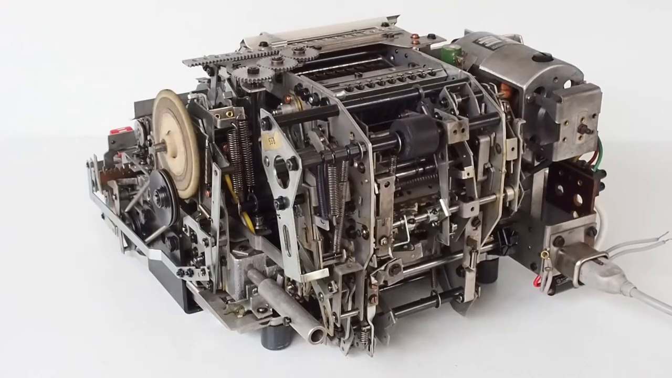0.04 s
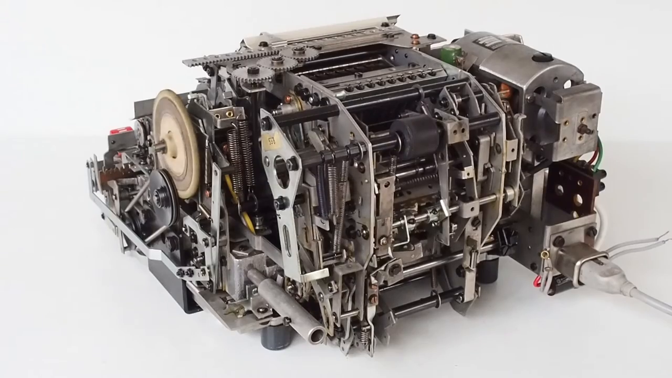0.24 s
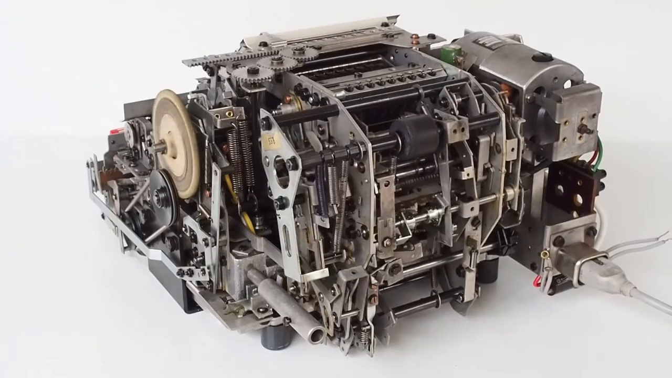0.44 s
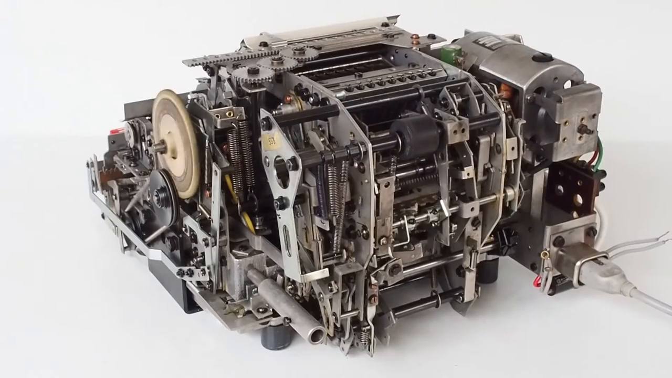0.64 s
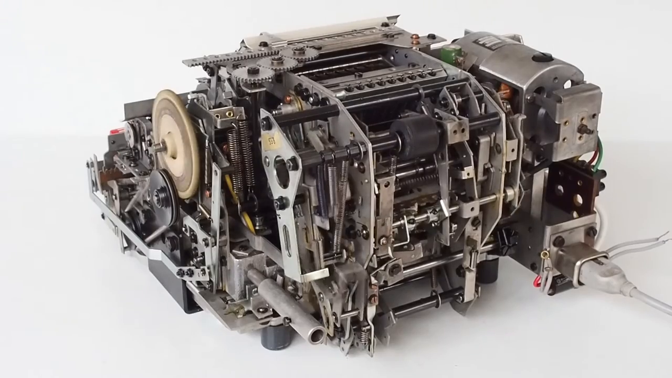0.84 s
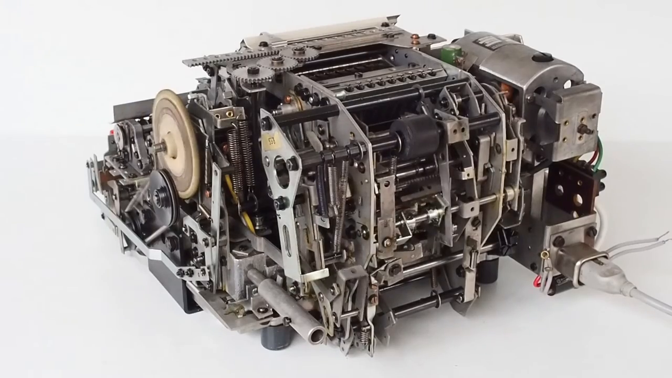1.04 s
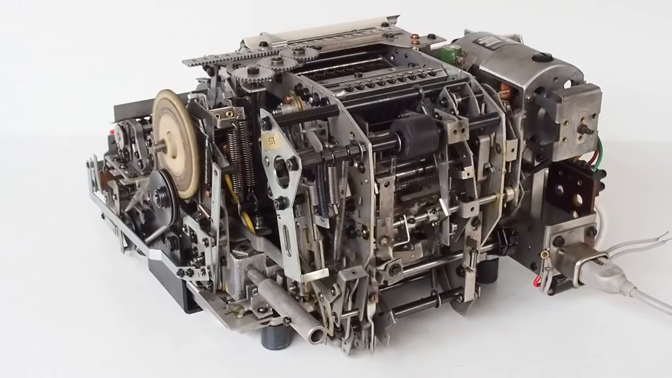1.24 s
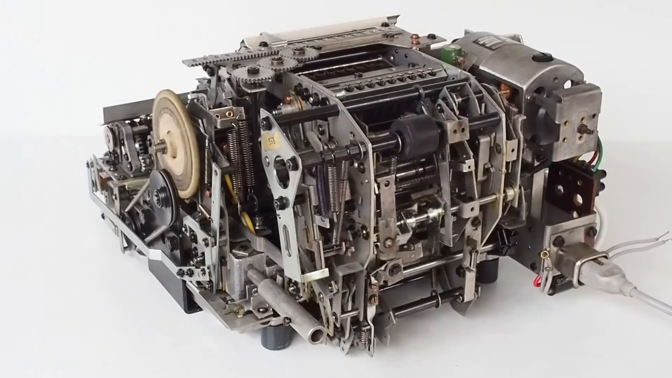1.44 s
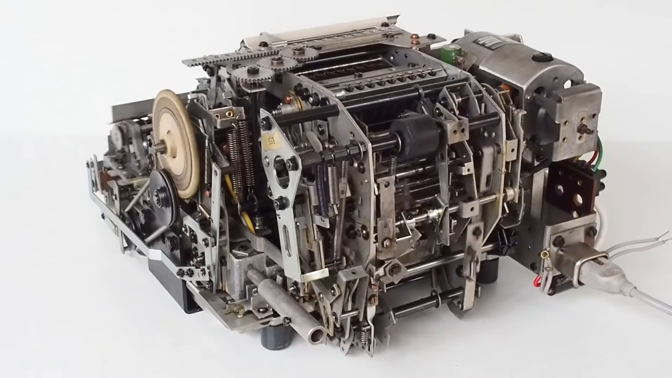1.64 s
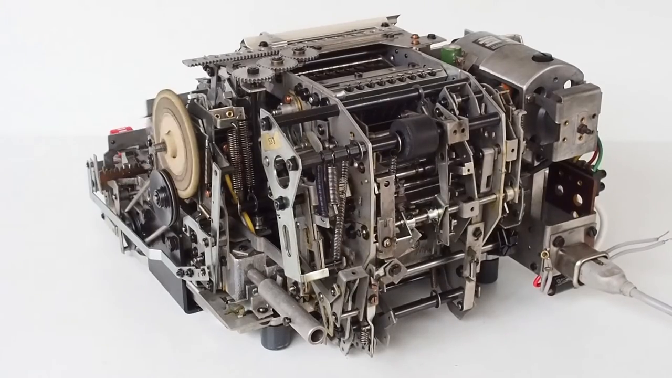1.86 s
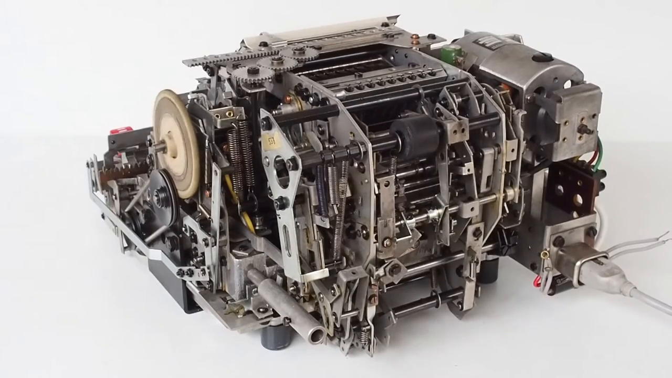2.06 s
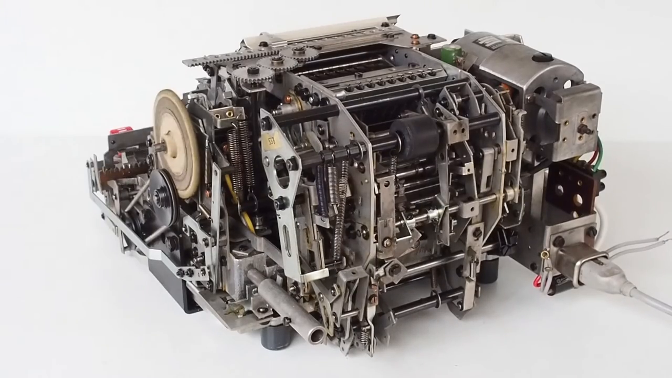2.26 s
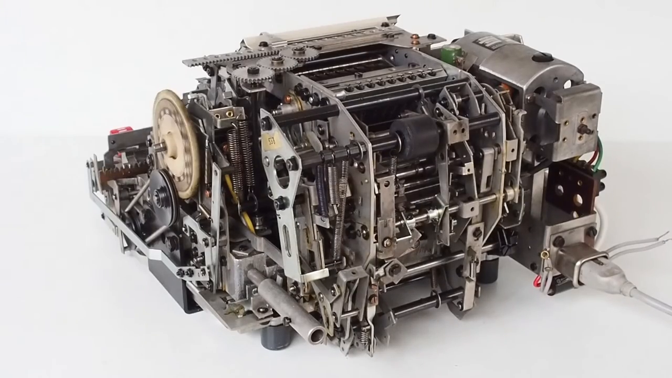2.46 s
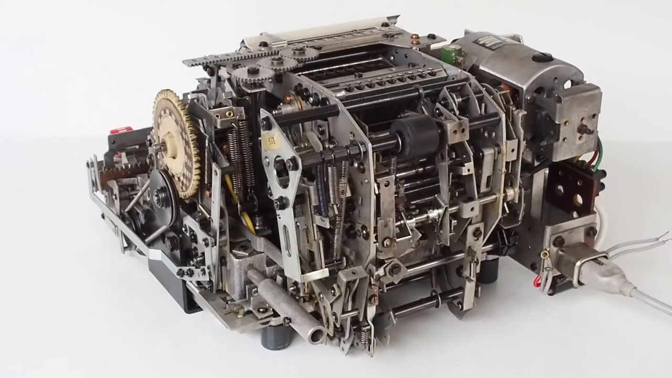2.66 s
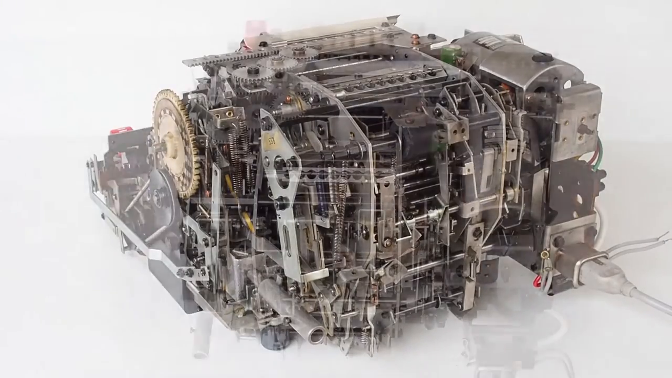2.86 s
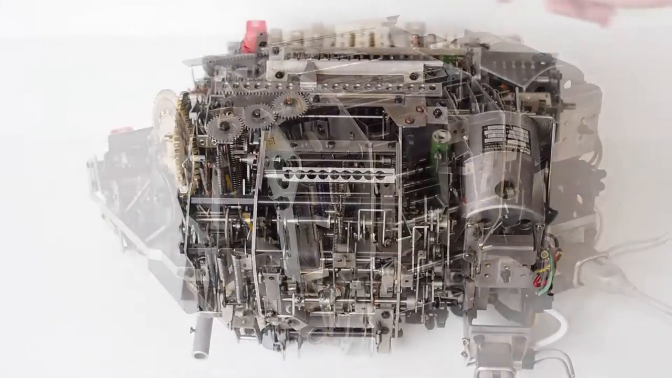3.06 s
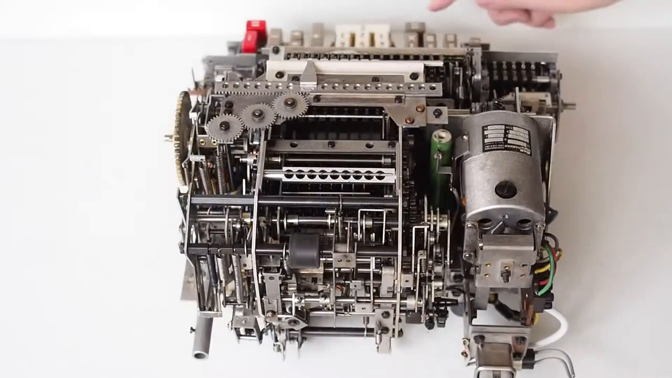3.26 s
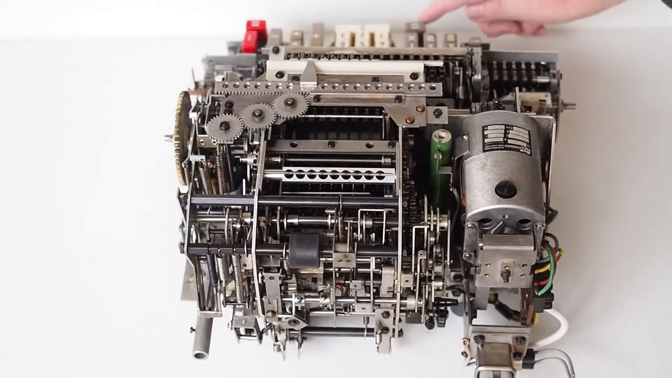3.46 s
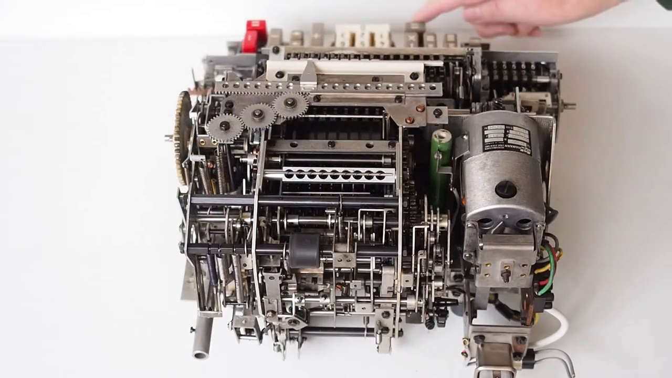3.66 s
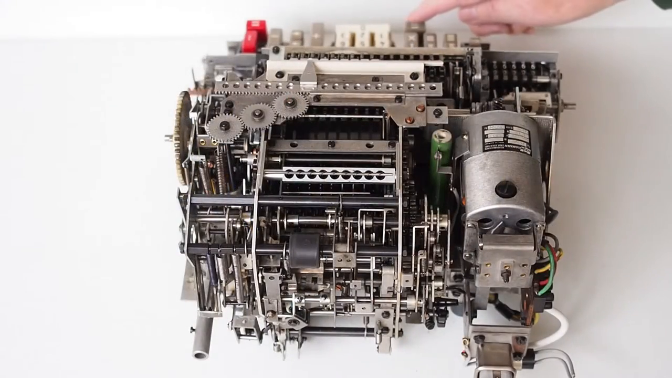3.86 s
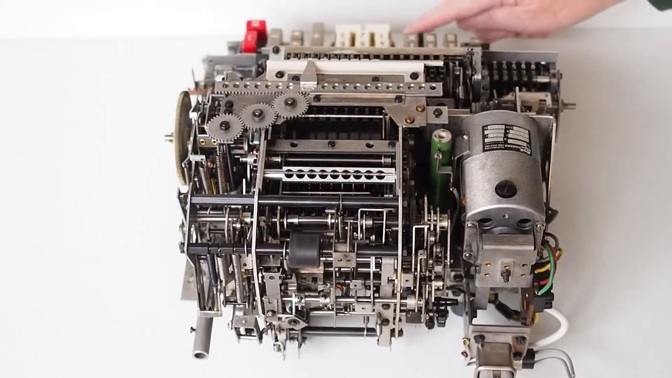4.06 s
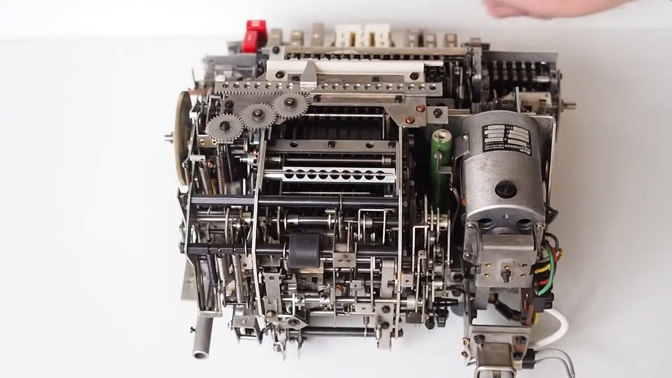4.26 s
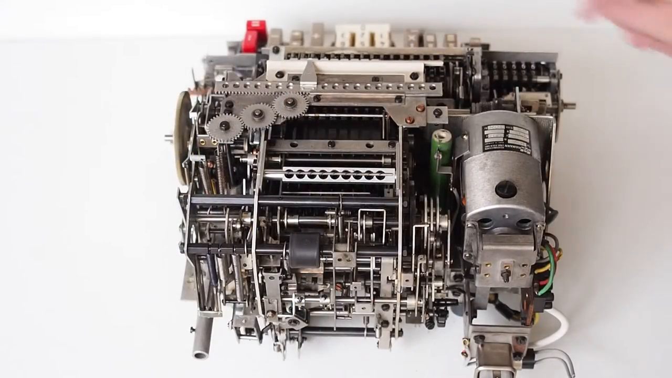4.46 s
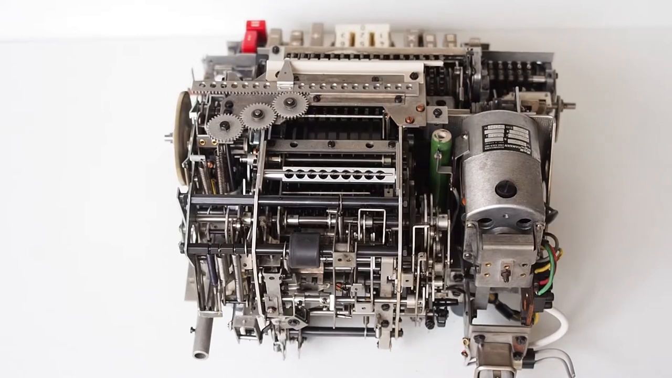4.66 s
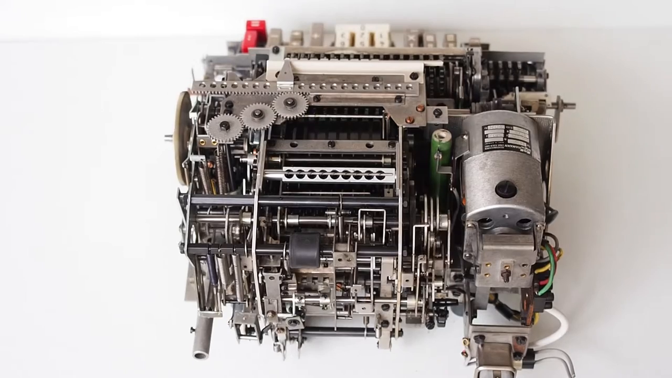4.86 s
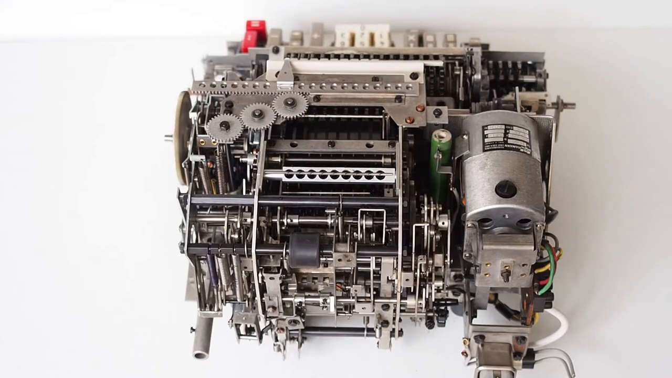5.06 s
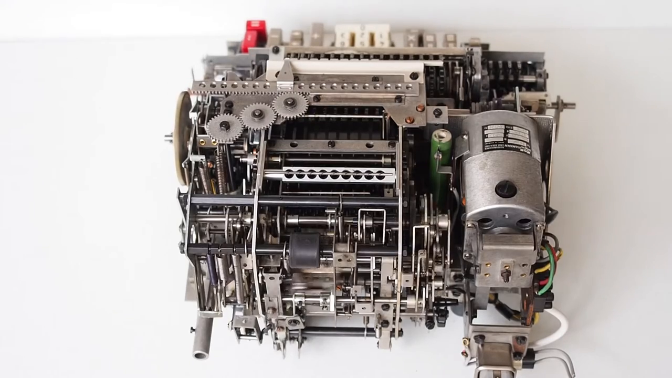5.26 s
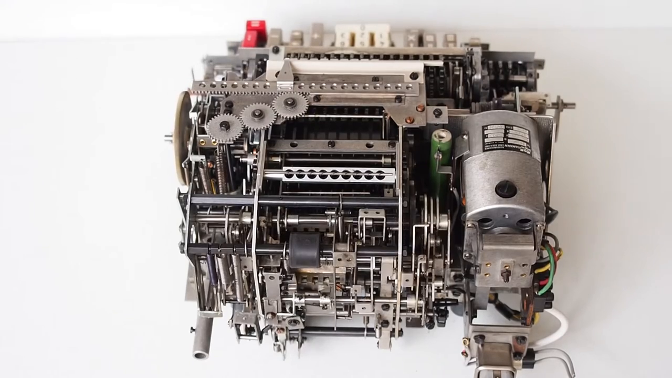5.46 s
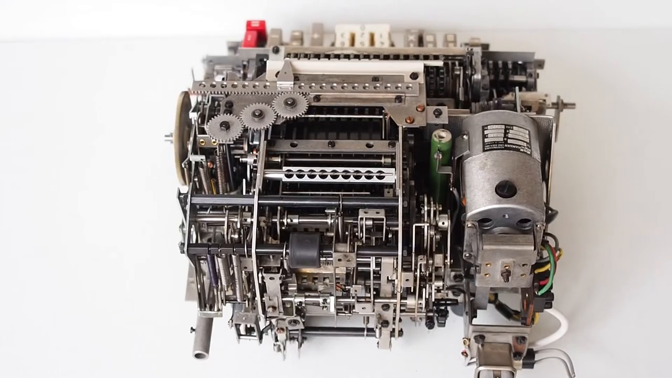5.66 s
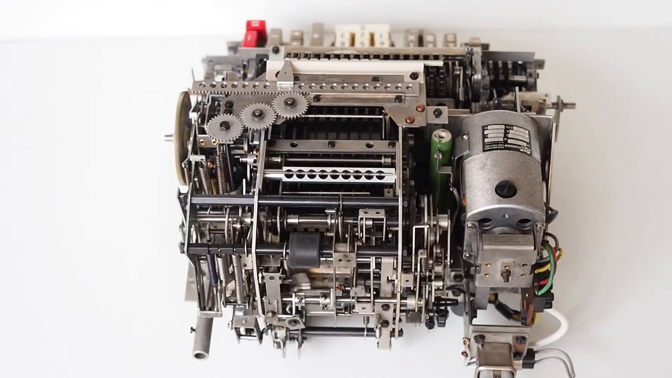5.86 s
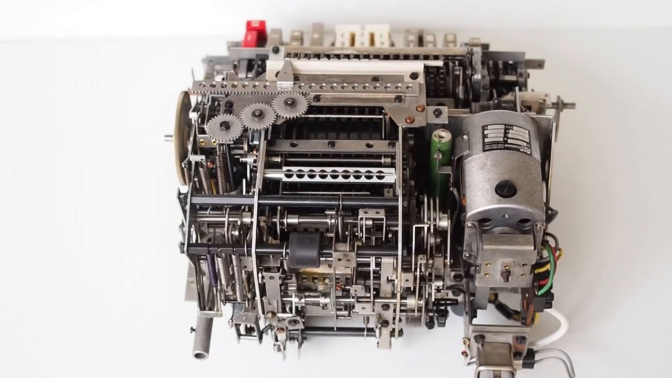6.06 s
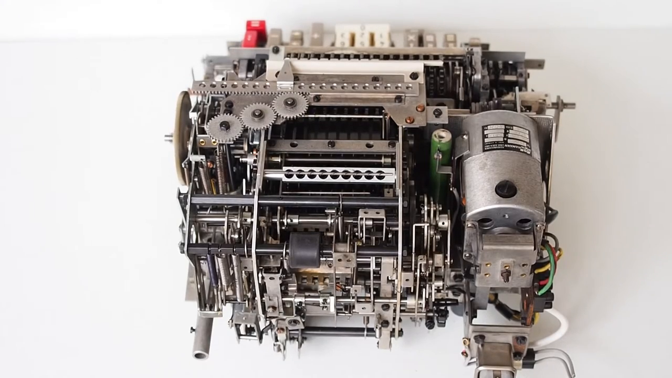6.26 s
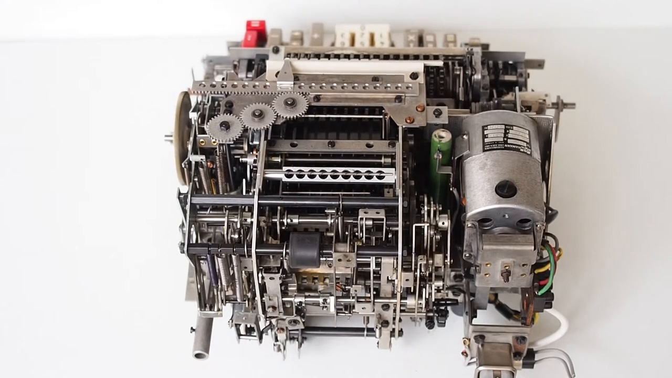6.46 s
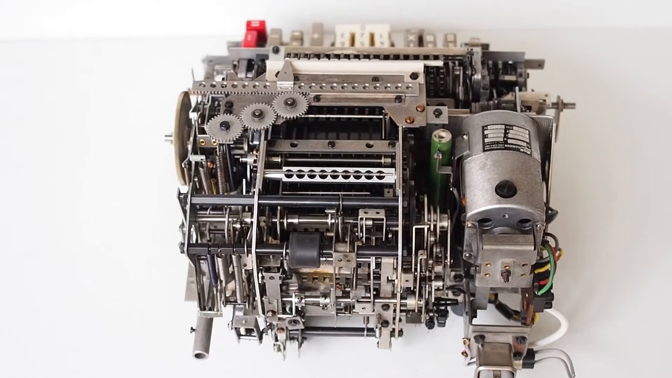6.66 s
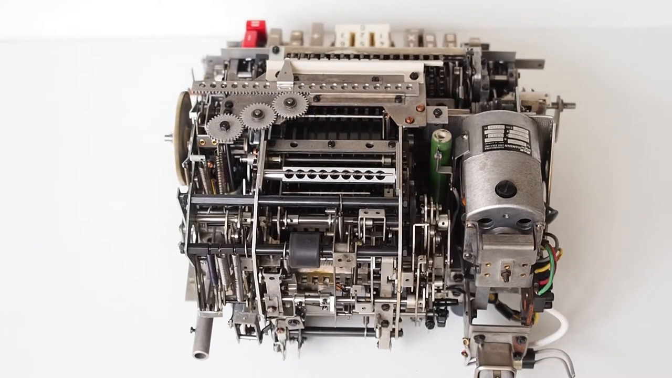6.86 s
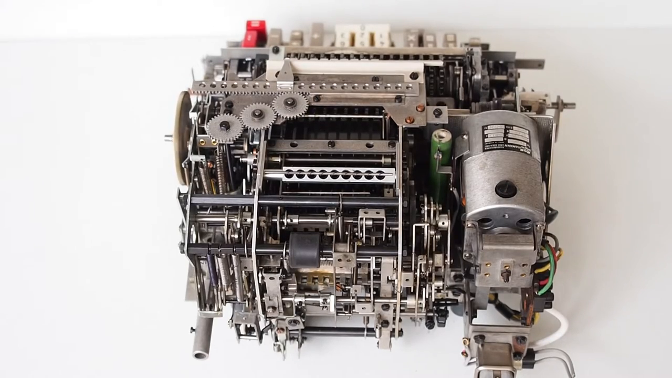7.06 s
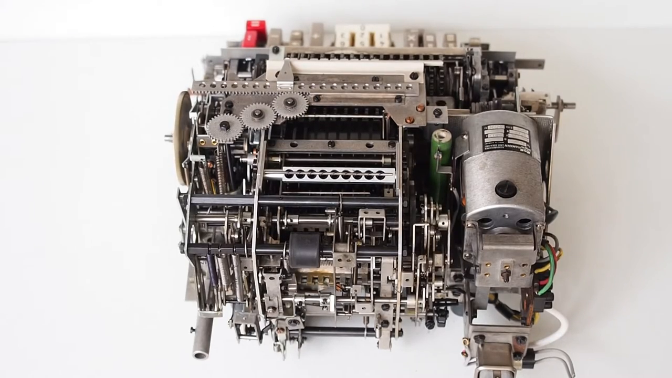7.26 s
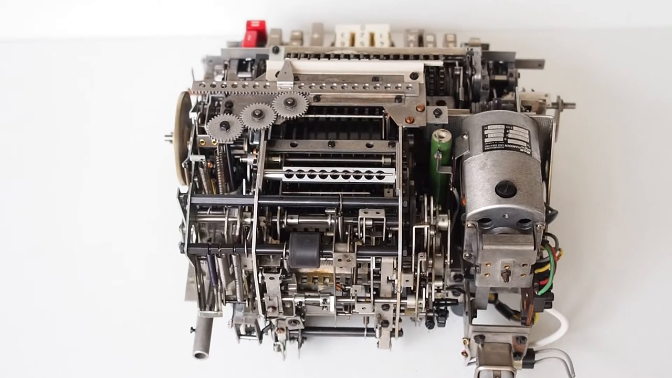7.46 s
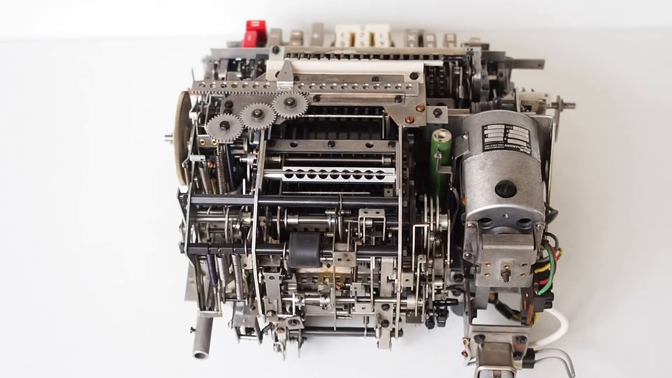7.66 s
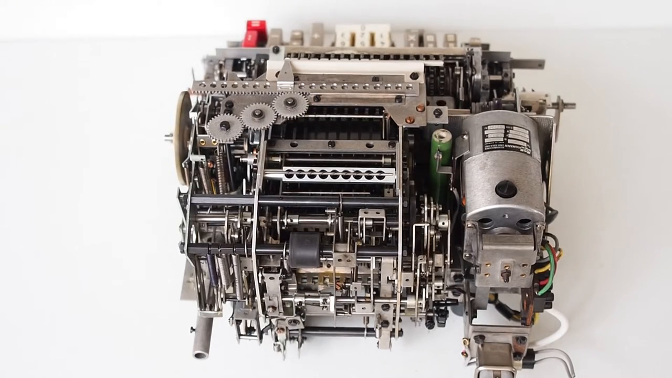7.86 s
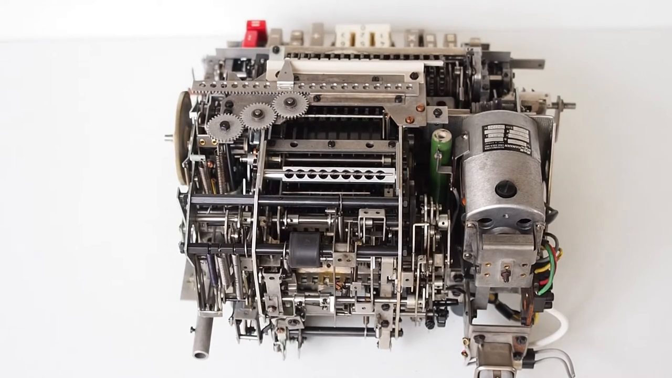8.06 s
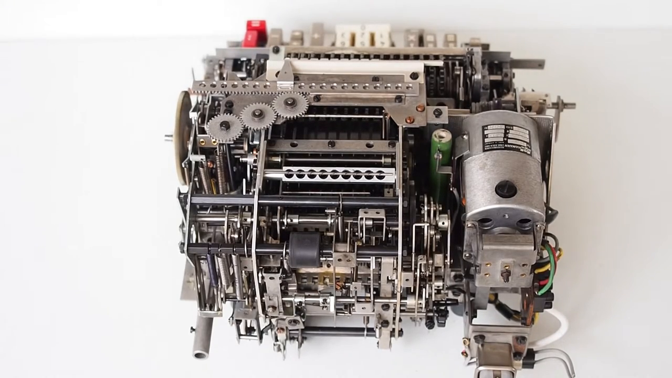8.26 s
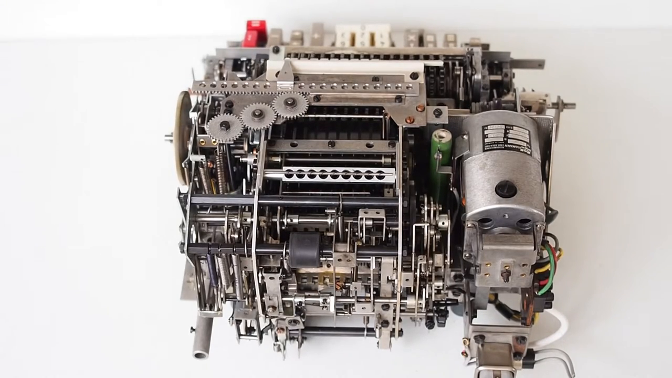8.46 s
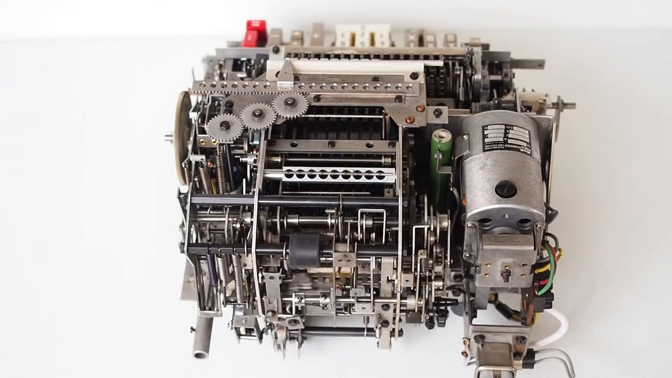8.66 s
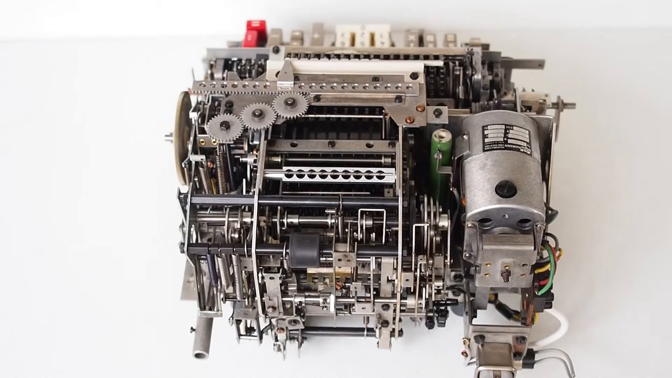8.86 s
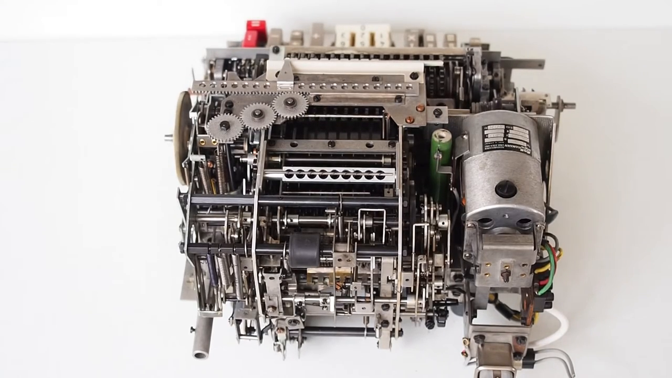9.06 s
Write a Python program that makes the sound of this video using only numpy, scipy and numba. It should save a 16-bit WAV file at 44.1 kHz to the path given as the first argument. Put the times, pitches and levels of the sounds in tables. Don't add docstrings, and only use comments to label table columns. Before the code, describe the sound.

Motor-driven steel levers and gears chatter in quick clusters, wind down to a quiet room, then kick back into busy clacking turns.

```python
import sys
import numpy as np
from scipy import signal
from scipy.fft import rfft, irfft, next_fast_len
from scipy.io import wavfile
from scipy.ndimage import map_coordinates
from numba import njit

SR = 44100
rng = np.random.default_rng(int(sys.argv[2]) if len(sys.argv) > 2 else 0)


def voltage_ratio(decibels):
    exponent = np.asarray(decibels, float) / 20
    return 10 ** exponent


def log_audio(samples):
    frames = np.atleast_2d(samples).T
    limited = np.clip(frames, -1, 1)
    pcm = np.round(limited * 32767).astype(np.int16)
    wavfile.write(sys.argv[1], SR, pcm)


N = 402176
SPLIT_HZ = 6000


def unit(x):
    return x / np.sqrt(np.mean(x ** 2) + 1e-20)


def along(points, hz):
    f, value = np.transpose(points)
    return np.interp(np.log(hz + 1), np.log(f + 1), value)


def curves(rows):
    s, *columns = np.transpose(rows)
    return [np.interp(np.arange(N) / SR, s, column) for column in columns]


def wobble(rate_hz):
    knots = rng.standard_normal(int(N * rate_hz / SR) + 4)
    return map_coordinates(knots, [np.arange(N) * rate_hz / SR], order=1)


def filtered(x, response):
    size = next_fast_len(N + SR // 2)
    hz = np.fft.rfftfreq(size, 1 / SR)
    return irfft(rfft(x, size) * response(hz), size)[..., :N]


# pitch_hz, likeness (0 to 1)
LIKENESS = [(30, 0.97), (200, 0.97), (700, 0.86), (1500, 0.82), (3000, 0.41), (12000, 0.47)]


def pair(noise, shape):
    def mid_side(hz):
        angle = np.arccos(np.clip(along(LIKENESS, hz), -1, 1)) / 2
        return shape(hz) * [np.cos(angle), np.sin(angle)]
    mid, side = filtered(noise, mid_side)
    return np.array([mid + side, mid - side])


def rush(spectrum, low_hz=0, high_hz=SR / 2):
    def colour(hz):
        return voltage_ratio(along(spectrum, hz)) * (hz > low_hz) * (hz < high_hz)
    return unit(pair(rng.standard_normal((2, N)), colour))


@njit
def add(out, start, radians, gain, fade, turn):
    for g in range(len(start)):
        step = np.exp(-fade[g] + 1j * radians[g])
        z = gain[g] + 0j
        lead = np.exp(1j * turn[g])
        for n in range(start[g], min(start[g] + int(7 / fade[g]), out.shape[1])):
            out[0, n] += (z * lead).imag
            out[1, n] += (z / lead).imag
            z *= step


def pings(s, hz, gain, t60):
    out = np.zeros((2, N))
    spread = np.sqrt(-np.log(np.clip(along(LIKENESS, hz), .01, 1)) / 2)
    turn = rng.standard_normal(s.shape) * spread
    fade = np.log(1000) / (t60 * SR) + 0 * s
    start, radians = (s.ravel() * SR).astype(np.int64), (2 * np.pi * hz / SR).ravel()
    add(out, start, radians, gain.ravel(), fade.ravel(), turn.ravel())
    return out


# pitch_hz, level_db (per Hz)
ROOM_COLOUR = [(18, -41), (45, -6), (90, -7), (200, -10.5), (500, -16.5), (1500, -21), (2200, -25.5),
               (4000, -26), (5400, -34.5), (6600, -29), (16200, -41)]
# start_s, hush_db, rustle_db
ROOM_AND_SLEEVE = [
    (2.7, -52, -75),
    (3.12, -50.5, -56),
    (3.4, -51.5, -71),
    (4.0, -52.5, -73),
]
# pitch_hz, level_db (per Hz)
GEAR_COLOUR = [(180, -46), (300, -11.5), (360, -42), (433, -8.5), (575, -20.5), (739, -7), (1160, -6),
               (1670, 0.5), (2010, -4), (3610, -2), (5210, -11.5), (11800, -6), (14000, -6.5), (16200, -17)]


def room_hush():
    hush_db, rustle_db = curves(ROOM_AND_SLEEVE)
    hush = voltage_ratio(hush_db + 0.42 * wobble(4.0)) * rush(ROOM_COLOUR)
    rustle = voltage_ratio(rustle_db - 1.0 + 1.2 * wobble(30)) * rush(GEAR_COLOUR, low_hz=1500)
    return hush + rustle


# start_s, pitch_hz, level_db
MOTOR_SPEED = [
    (0, 147.1, -61),
    (2.2, 145.9, -56.5),
    (2.3, 143, -86),
    (4.1, 139.5, -100),
    (4.2, 146.1, -64),
    (9.12, 145.3, -60),
]
# multiple of the shaft speed, level_db
WINDING_TONES = [(2, 7), (3, 3), (5, -3)]


def motor():
    hz, db = curves(MOTOR_SPEED)
    phase = 2 * np.pi * np.cumsum(hz * (1 + .003 * wobble(5))) / SR
    hum = sum(voltage_ratio(level + 1.5 * wobble(8)) * np.sin(k * phase) for k, level in WINDING_TONES)
    return voltage_ratio(db) * hum


# start_s, level_db
GEAR_LOAD = [(0, -28), (1.3, -28), (1.75, -31), (2.1, -29), (2.25, -35.5), (2.45, -46.5), (2.6, -58.5),
             (2.75, -69), (4.05, -69), (4.1, -35), (4.13, -32.5), (4.65, -30), (4.93, -39.5), (5.2, -32),
             (5.85, -29), (7.3, -30), (8.5, -32), (9.12, -28.5)]
# pitch_hz, level_db (per Hz)
DESK_COLOUR = [(40, -35), (62, -22), (95, -3.5), (135, -5), (160, 1.5), (185, -8.5), (222, -6.5),
               (270, -14.5), (310, -22.5), (600, -38)]


def gears():
    hum_hz = 899
    t = np.arange(N) / SR
    load_db, = curves(GEAR_LOAD)
    bites = np.transpose(CLUTCH_BITES)[0]
    idle = 0
    for s, _ in LATCH_DROPS:
        bite = bites[bites > s][0]
        idle = idle + np.interp(t, [s, s + .08, bite, bite + 0.0087], [0, 1, 1, 0])
    load_db = load_db + .8 * wobble(50) + 1.6 * wobble(350)
    mesh = voltage_ratio(load_db - 4.5 * idle) * rush(GEAR_COLOUR, low_hz=hum_hz, high_hz=SPLIT_HZ)
    hum = voltage_ratio(load_db - 15.5) * rush(GEAR_COLOUR, high_hz=hum_hz)
    fizz = voltage_ratio(load_db + 1.5 - 3 * idle + 0.6 * wobble(150)) * rush(GEAR_COLOUR, low_hz=SPLIT_HZ)
    return mesh + hum + fizz


def desk():
    t = np.arange(N) / SR
    load_db, = curves(GEAR_LOAD)
    kicks = [(row[0], -48.5 + (row[1] + 20) * 0.55) for row in COUNTING_TURNS]
    kicks += [(s + 0.046, -44.5) for s, _ in CARRIAGE_STEPS]
    kicks += [(4.12, -37)]
    thuds = sum(voltage_ratio(db - 60 * np.abs(t - s) / np.where(t > s, 0.48, .08)) for s, db in kicks)
    steady = voltage_ratio(-47 + .55 * (load_db + 30))
    return (steady + thuds) * voltage_ratio(2.9 * wobble(14)) * rush(DESK_COLOUR)


def contacts(s, length, count):
    waits = rng.exponential(size=(len(s), count, 2)).sum(axis=2)
    return s[:, None] + np.abs(length)[:, None] * 4.5 * np.tanh(waits / 4.5)


# pitch_hz, level_db (per Hz)
STEEL_COLOUR = [(240, -54.5), (400, -25.5), (657, -4.5), (766, 6.5), (923, -9.5), (1010, -8.5), (1150, -5),
                (1260, -6), (1970, -8), (2300, -1.5), (4140, -0.5), (5740, -7.5), (13700, -3.5),
                (15600, -9), (16200, -49)]


def rattle(impacts, db, length, low_hz, high_hz, t60, uneven_db, struck, count):
    s, weight = impacts
    shape = (len(s), count)
    which = np.arange(count) % s.shape[1]
    loose = rng.uniform(size=shape) > struck[:, None]
    at_impact = s[:, which] + .0004 * rng.exponential(size=shape)
    when = np.where(loose, contacts(s[:, 0], length, count), at_impact)
    hz = rng.uniform(low_hz, high_hz, shape)
    force = voltage_ratio(db) * np.sqrt(np.abs(length) / t60)
    colour = voltage_ratio(along(STEEL_COLOUR, hz) + uneven_db * rng.standard_normal(shape))
    size = force[:, None] * np.where(loose, 1, weight[:, which]) * colour
    return pings(when, hz, size, t60 * voltage_ratio(1.7 * rng.standard_normal(shape)))


# start_s, rack_sweep_db, stop_db, tens_carry_db, frame_ring_db
COUNTING_TURNS = [(.089, -19.5, -12, -14.5, -31), (.272, -19.5, -16, -27, -32.5),
                  (.651, -17.5, -14.5, -19, -28), (.834, -19, -13, -20, -28.5), (1.222, -19, -17, -26, -28),
                  (1.603, -23.5, -17.5, -22, -37), (5.052, -23.5, -16.5, -32, -36),
                  (5.237, -19.5, -17.5, -18, -33), (5.631, -16, -16, -17, -29), (5.815, -16, -15, -23, -31),
                  (6.208, -17, -15, -21, -27.5), (6.391, -21, -13, -29, -27),
                  (6.575, -15.5, -17, -15.5, -22.5), (6.952, -19, -14, -33, -26),
                  (7.137, -17, -15, -16, -25.5), (7.321, -20.5, -16.5, -31, -30.5),
                  (7.502, -17, -14.5, -22, -26), (7.871, -16, -13.5, -32, -24.5),
                  (8.054, -26, -18, -23.5, -30), (8.237, -24, -13, -21.5, -27.5),
                  (8.417, -23, -15.5, -17.5, -27), (8.602, -20, -12, -17, -27.5),
                  (8.982, -20, -13, -27, -25.5)]
# start_s, level_db
CARRIAGE_STEPS = [(.386, -18.5), (.958, -19), (1.340, -21), (5.355, -21), (5.937, -18.5), (6.694, -19),
                  (7.598, -18), (8.720, -18)]


def repeats():
    turn = np.transpose(COUNTING_TURNS)[0]
    ahead = np.transpose(CARRIAGE_STEPS)[0] - turn[:, None]
    return turn[~np.any((ahead > 0) & (ahead < .15), axis=1)]


def part(rule, s, force_db, ring_db):
    clack, chatter, ring, length = rule
    return np.transpose([s, force_db + clack, force_db + chatter, ring_db + ring, length + 0 * s])


# start_s, level_db
CLUTCH_BITES = [(.052, -27), (.612, -24), (1.189, -22), (1.584, -26), (4.999, -25.5), (5.594, -23.5),
                (6.169, -26), (6.915, -24), (7.809, -21), (8.942, -23)]
# start_s, level_db
LATCH_DROPS = [(.467, -24), (1.040, -17), (1.426, -16.5), (5.435, -20.5), (6.019, -21), (6.779, -21),
               (7.707, -19.5), (8.792, -21)]
# clack_db, chatter_db, ring_db, length_s
RACK_RETURN = [
    (-26, -27, -53, .002),
    (-25.5, -24, -52, .01),
    (-34, -25, -52.5, .0025),
]
# start_s, clack_db, chatter_db, ring_db, length_s
SINGLE_STROKES = [(0.025, -29, -25, -44, .013), (1.673, -21, -20, -38, 0.0039),
                  (2.134, -16, -17.5, -21, .004), (2.156, -20, -18, -42, .0033),
                  (4.053, -35, -41.5, -49, .0057), (4.093, -39, -42, -42, .012),
                  (4.106, -32, -19.5, -46, .0032), (4.140, -32, -30, -48, .022),
                  (4.168, -24.5, -22, -42, .005), (4.184, -20, -15, -46, .019),
                  (4.222, -37, -10.5, -55, .005), (4.4, -23, -19.5, -53, .004),
                  (4.498, -30, -28, -45, .011), (4.588, -21, -12, -31, .0095),
                  (4.659, -37, -10, -49, .0015), (4.672, -30, -28, -51, .015),
                  (4.723, -25.5, -21.5, -30, .02), (4.781, -23.5, -20, -41, 0.0094),
                  (4.875, -35, -30, -40, .003), (7.917, -20, -17, -38, .012),
                  (7.945, -22, -15, -26.5, .004), (7.969, -16, -14, -44, .002)]


def strokes():
    turn, sweep, stop, carry, ring = np.transpose(COUNTING_TURNS)
    shift, slide = np.transpose(CARRIAGE_STEPS)
    latch, drop = np.transpose(LATCH_DROPS)
    bite, grip = np.transpose(CLUTCH_BITES)
    again, tooth = repeats(), np.arange(6)
    tooth_db = .6 * tooth
    rows = [part((-4, 1, 0.5, 0.0084), turn, sweep, ring),
            part((-4, 0, -1.2, 0.005), turn + .020, stop, ring),
            part((-7.5, -7, -8, 0.01), turn + .036, sweep, ring),
            part((-5, 0, -10.5, 0.0079), turn + .043, carry, ring)]
    for delay, rule in zip((.075, .123, .142), RACK_RETURN):
        rows.append(part(rule, again + delay, 0 * again, 0 * again))
    rows += [part((-4, .5, -15, 0.0123), shift, slide, slide),
             part((-4.5, -1.5, -23, .003), shift + .016, slide, slide),
             part((-.5, -0.5, -18, .002), latch, drop, drop),
             part((.5, -5, -10, .008), bite, grip, grip),
             SINGLE_STROKES,
             part((-21.5, -28.5, -45, -0.0018), 1.7665 + .0643 * tooth, tooth_db, tooth_db)]
    return np.vstack(rows)


# pitch_hz, level_db, t60_s
FRAME_TONES = [(760, -10, .08), (870, -11, .07), (988, 0, .085), (1050, -2, .075), (1265, -5, .07),
               (1390, -4, .08), (1593, -5, .07), (1880, -5, .07)]
# start_s, level_db, pitch_hz
CREAKS = [
    (2.46, -37, 1730),
    (2.5, -41.5, 2000),
    (2.64, -47, 1400),
    (3.9, -48, 2310),
]


def levers():
    s, clack_db, chatter_db, ring_db, length = strokes().T
    s = s + .0012
    hits = contacts(s, .7 * length, count=9)
    hits[:, 0] = s
    weight = voltage_ratio(2.4 * rng.standard_normal(hits.shape))
    weight[:, 0] = np.clip(0.013 / np.abs(length), .5, 2.4)
    struck = np.clip(0.0049 / np.abs(length), .3, .75)
    impacts = hits, weight / np.sqrt(np.mean(weight ** 2, axis=1, keepdims=True))
    clack = rattle(impacts, clack_db - .9, length, low_hz=1204, high_hz=SPLIT_HZ, t60=.016,
                   uneven_db=3.0, struck=struck, count=120)
    chatter = rattle(impacts, chatter_db - 1.5, length, low_hz=SPLIT_HZ, high_hz=16340, t60=0.013,
                     uneven_db=2.5, struck=struck, count=300)
    hz, mode_db, t60 = np.tile(np.transpose(FRAME_TONES), 3)
    shape = (len(s), len(hz))
    size = voltage_ratio(ring_db[:, None] - 3 + mode_db + 3.3 * rng.standard_normal(shape))
    mode_hz = hz * (1 + 0.017 * rng.standard_normal(shape))
    ring = pings(contacts(s, .45 * length, len(hz)), mode_hz, size, t60)
    creak_s, creak_db, creak_hz = np.transpose(CREAKS)
    return clack + chatter + ring + pings(creak_s, creak_hz, voltage_ratio(creak_db), 0.043)


# delay_s, pitch_hz, level_db
LOOSE_PARTS = [
    (.076, 3800, -21),
    (.078, 7000, -23),
    (.124, 3900, -22),
    (.149, 11400, -16),
]


def springs():
    delay, hz, db = np.transpose(LOOSE_PARTS)
    s = repeats()[:, None] + delay
    hz = hz * (1 + 0.015 * rng.standard_normal(s.shape))
    return pings(s, hz, voltage_ratio(db + 3 * rng.standard_normal(s.shape)), .017)


# pitch_hz, t60_s
ROOM_DECAY = [(300, 0.65), (2000, 0.36), (8000, 0.34), (16000, 0.16)]


def walls(x):
    hz, t, z = signal.stft(rng.standard_normal((2, SR // 2)), SR, nperseg=256)
    dying = voltage_ratio(-60 * t / along(ROOM_DECAY, hz)[:, None])
    tail = signal.istft(z * dying, SR, nperseg=256)[1]
    late = np.pad(x.mean(axis=0), (250, 0))[None]
    echo = signal.fftconvolve(late, tail / np.linalg.norm(tail[0]), axes=1)
    return pair(echo[:, :N], np.ones_like)


# pitch_hz, left_minus_right_db
BALANCE = [(60, 1.5), (180, -1), (550, -0.5), (1650, -2.5), (4970, -0.5), (15000, 1)]


def scene():
    blows = levers() + springs()
    blows = filtered(blows, lambda hz: 1 / (1 + (520 / (hz + 1)) ** 3))
    machine = blows + voltage_ratio(-5) * walls(blows) + gears() + desk() + motor()
    machine = filtered(machine, lambda hz: voltage_ratio(along(BALANCE, hz) * [[.5], [-.5]]))
    return machine + room_hush()


def roll_off(x):
    return signal.sosfilt(signal.butter(12, 16340, fs=SR, output="sos"), x)


def record(dry):
    x = dry / (1 + np.abs(dry / 1.1) ** 5) ** (1 / 5)
    x = filtered(x, lambda hz: 1 / (1 + (hz / 16100) ** 200)) - .0022
    return roll_off(x)


dry = scene()
out = record(dry)
log_audio(out)
```